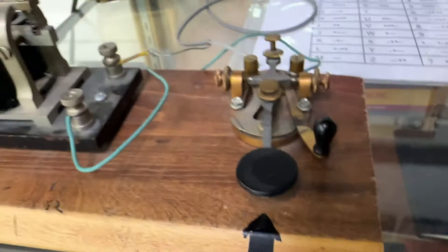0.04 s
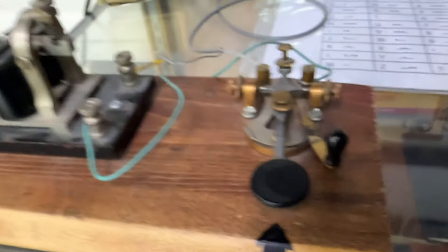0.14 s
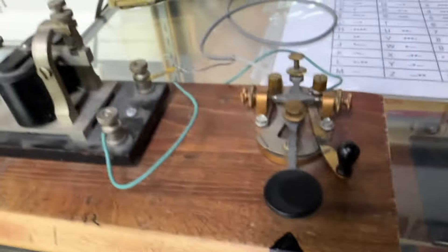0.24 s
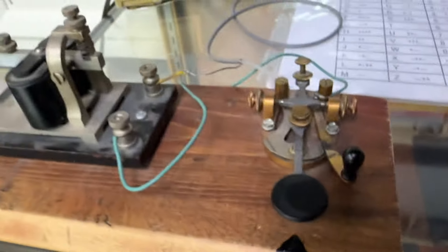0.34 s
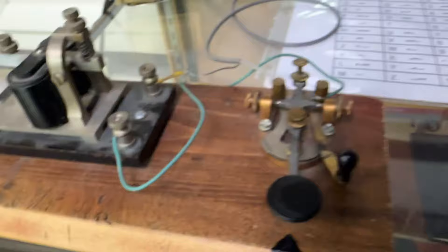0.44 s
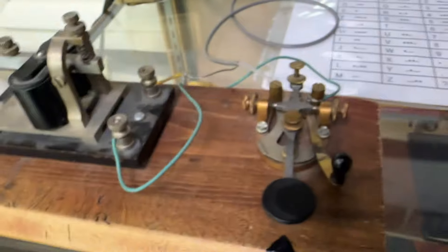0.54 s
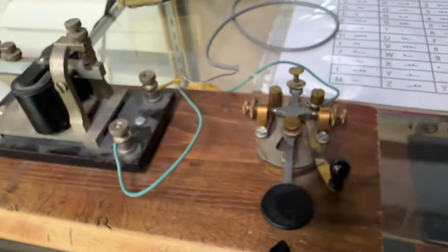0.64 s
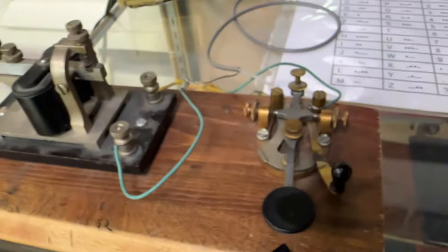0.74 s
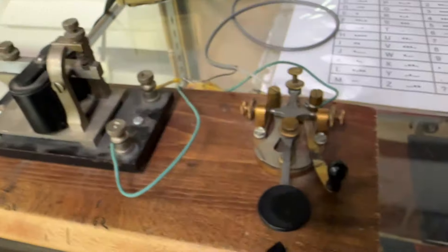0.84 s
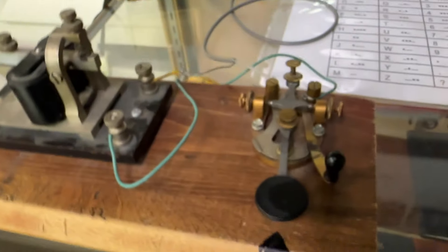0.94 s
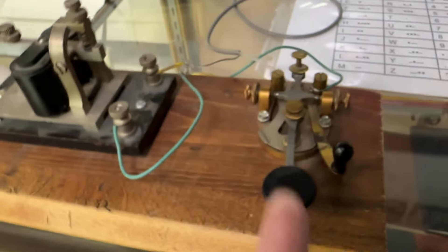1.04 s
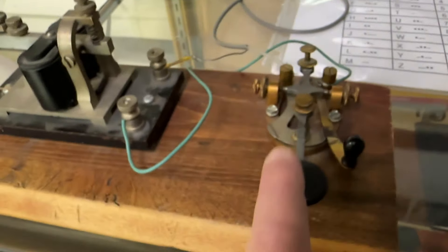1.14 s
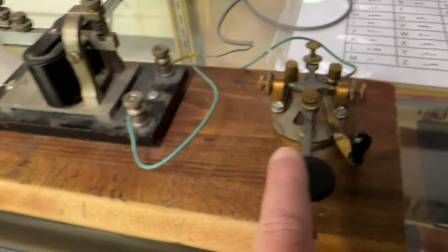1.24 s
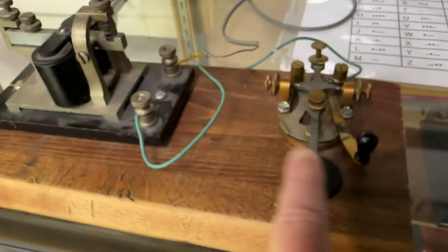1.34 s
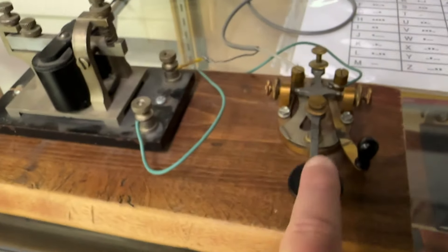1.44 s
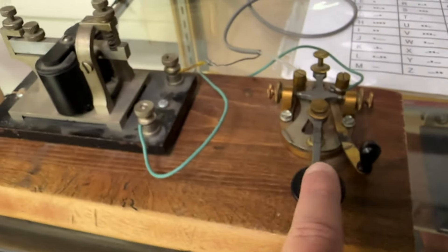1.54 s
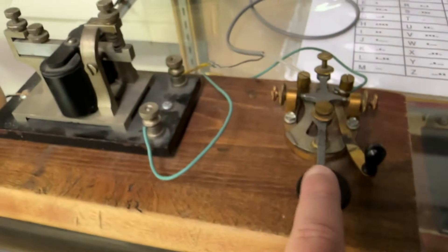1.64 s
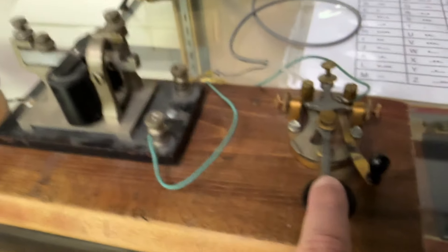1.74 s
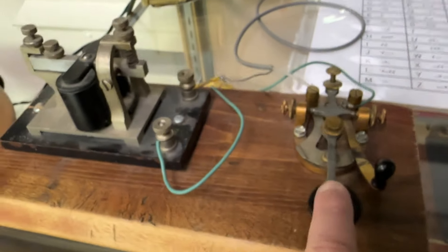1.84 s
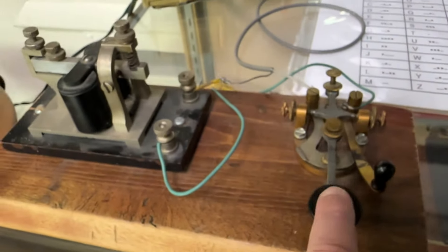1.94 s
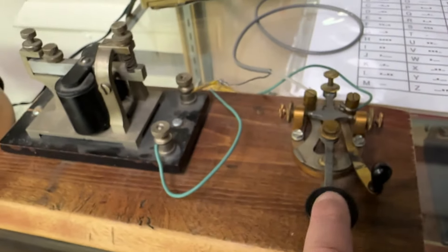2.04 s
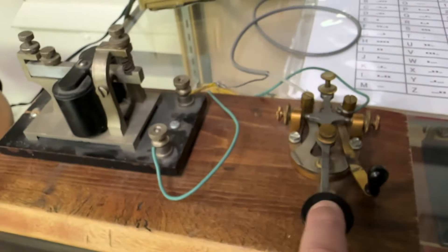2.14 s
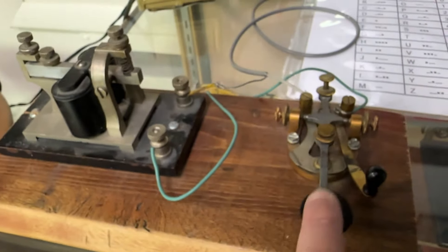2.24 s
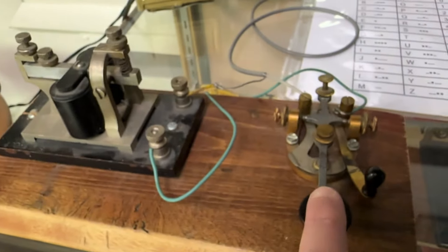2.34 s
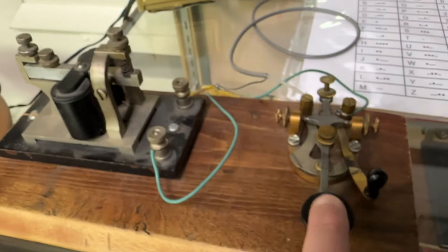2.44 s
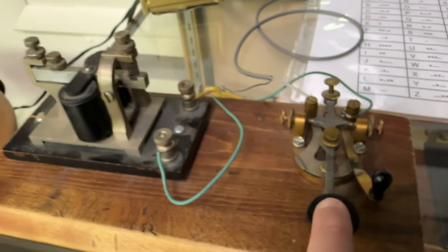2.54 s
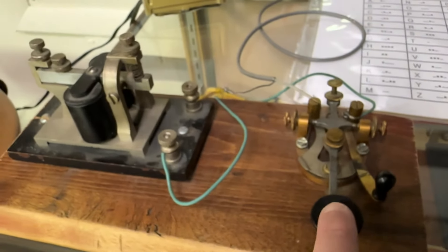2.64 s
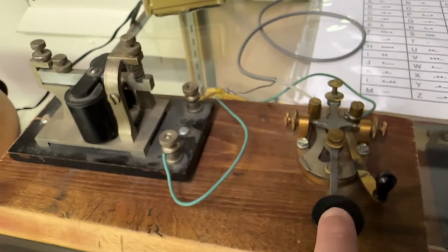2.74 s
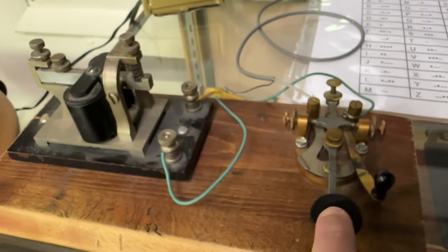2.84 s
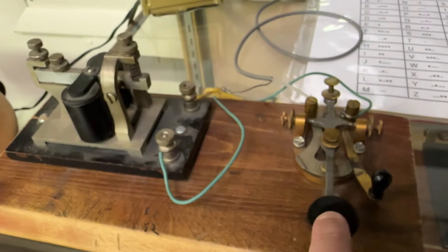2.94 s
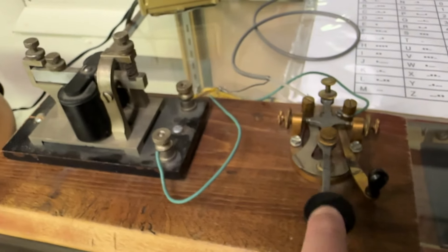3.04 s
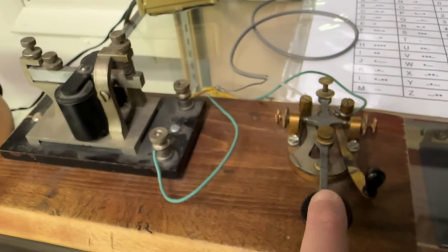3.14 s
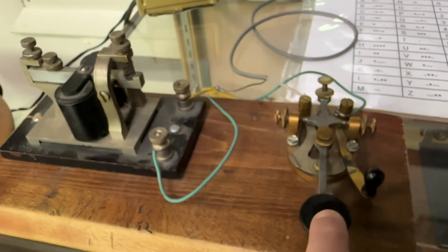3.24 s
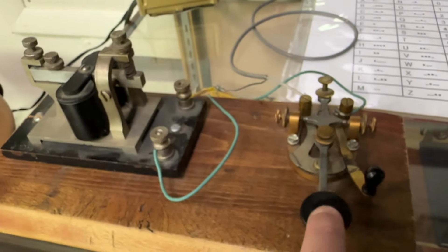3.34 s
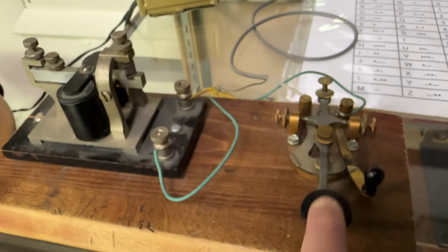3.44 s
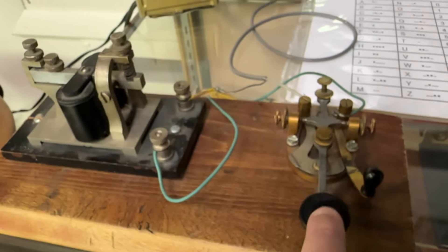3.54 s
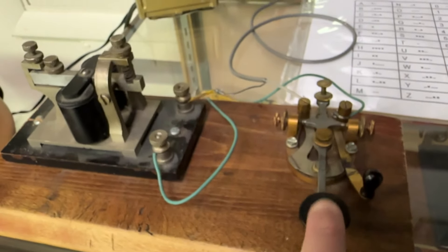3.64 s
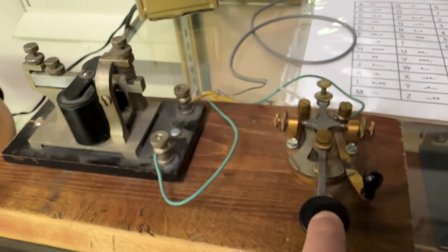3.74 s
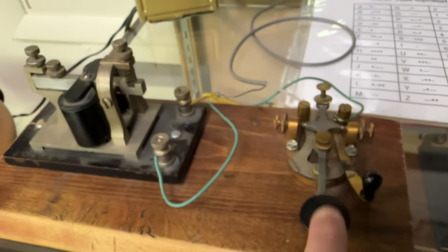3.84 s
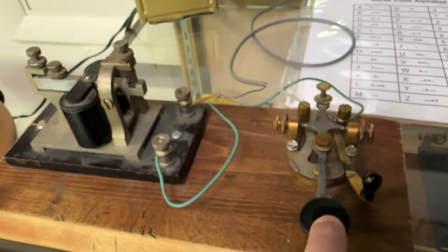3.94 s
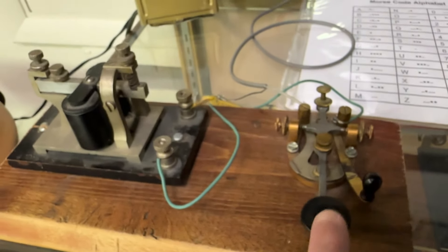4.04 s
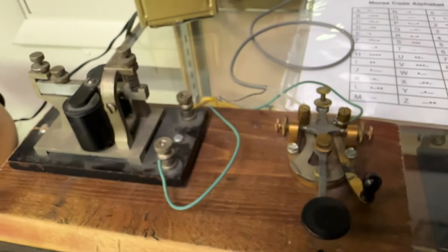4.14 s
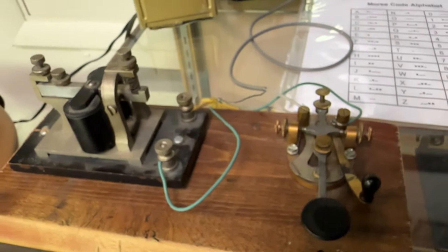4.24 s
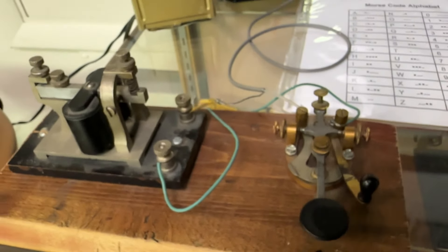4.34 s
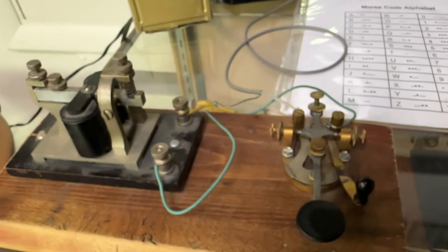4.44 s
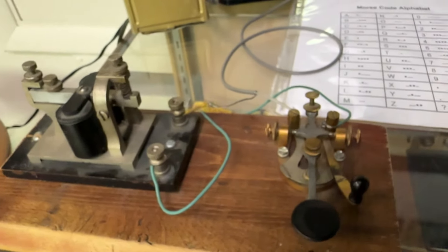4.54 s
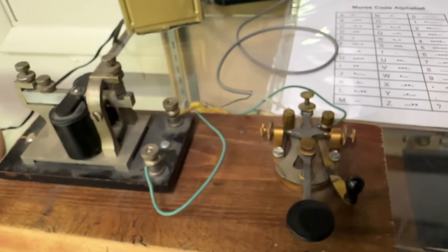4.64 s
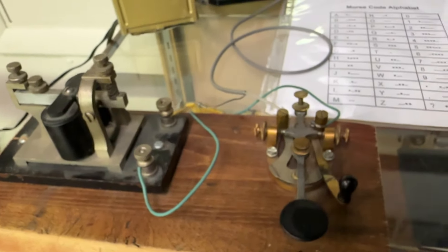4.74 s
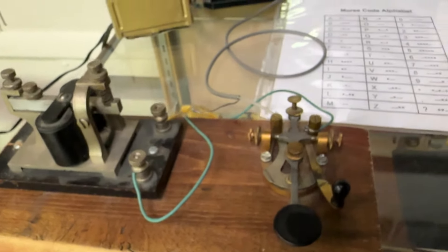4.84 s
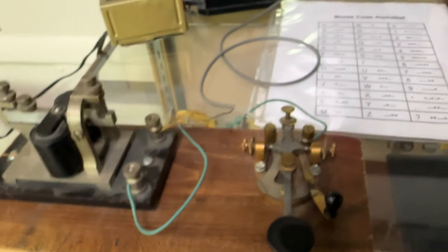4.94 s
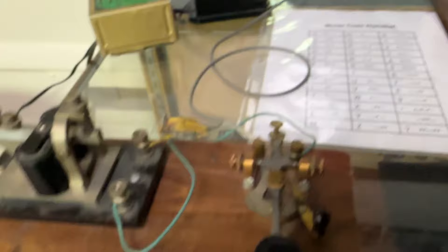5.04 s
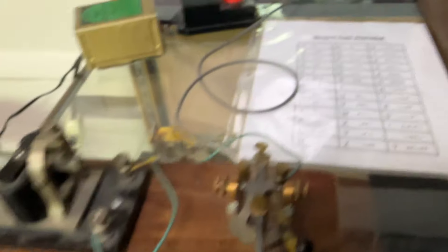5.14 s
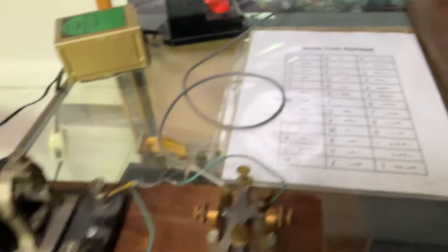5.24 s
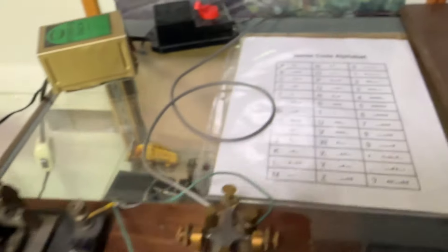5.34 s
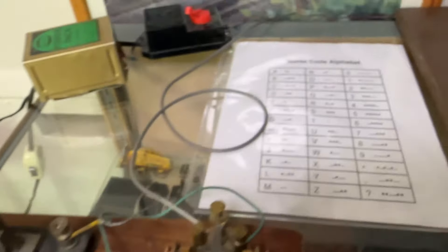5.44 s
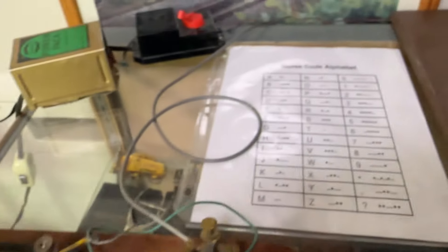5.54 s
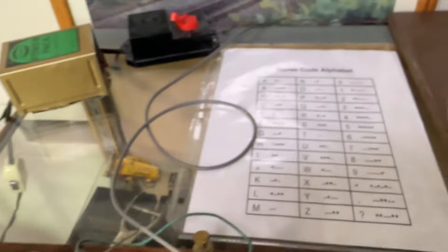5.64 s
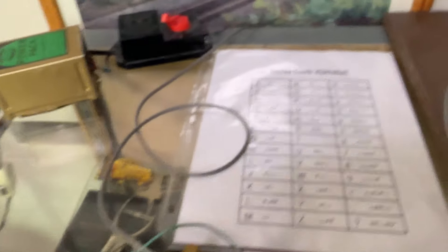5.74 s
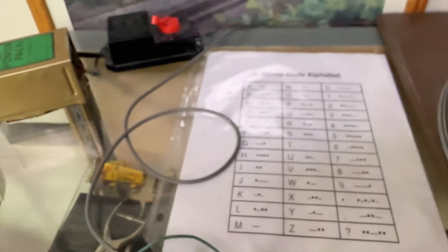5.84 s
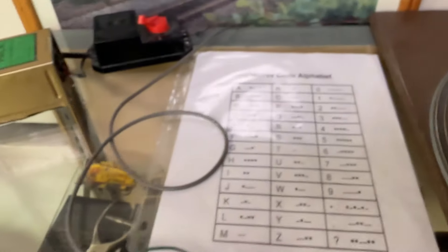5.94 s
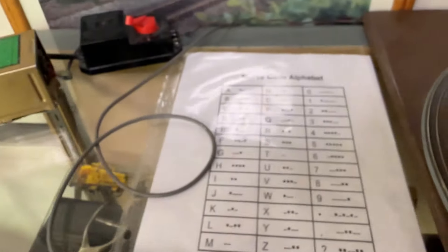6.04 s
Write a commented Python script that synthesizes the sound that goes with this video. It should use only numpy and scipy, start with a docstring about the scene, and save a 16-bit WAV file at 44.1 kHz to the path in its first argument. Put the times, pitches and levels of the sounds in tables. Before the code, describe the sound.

Five crisp metallic double clicks from a telegraph key and sounder on a wooden board, over a steady low fan hum in a small room.

```python
"""At first a hand rubs softly on a camera, while a ventilation fan hums and rushes and a high drone fades.
Then a finger taps a telegraph key five times on a wooden board, in a small room. Each press ticks the contact
and a sounder, mostly on the left, clicks down; on release it clacks up and the key meets its back stop.
Later the camera's lens drive rustles, whines in short bursts and hisses once, over a lower drone.
Blows are fading sine waves and noise bursts; the fan, drones and lens are sine waves and filtered noise."""
import sys
import numpy as np
from scipy import signal
from scipy.fft import rfft, irfft, next_fast_len
from scipy.io import wavfile
from scipy.ndimage import map_coordinates

SR = 44100
rng = np.random.default_rng(int(sys.argv[2]) if len(sys.argv) > 2 else 0)


def transcribe(u):
    """Save the signal u as a 16-bit wav file named by the first command-line argument.

    u: samples, shape (n,) or (channels, n), limited to [-1, 1]; the rate is SR.
    q: integer samples, one column per channel.
    """
    v = np.clip(np.atleast_2d(u).T, -1, 1)
    q = np.round(v * 32767).astype(np.int16)
    wavfile.write(sys.argv[1], SR, q)


N = 269010
T = np.arange(N) / SR  # time in seconds
AGE = T[:SR // 5]  # seconds since a blow

# The five taps. Each row: key contact closes in seconds, sounder lever hits anvil in seconds,
# lever hits upper screw in seconds, key meets back stop in seconds, finger's knock in dB, back stop in dB.
TAP_TIMES = [(2.0022, 2.021, 2.0863, 2.1294, -30, -32), (3.166, 3.1855, 3.2606, 3.2988, -31, -30),
             (3.414, 3.4369, 3.4681, 3.5016, -31, -30.5), (3.6138, 3.6295, 3.6762, 3.7036, -26.5, -30.5),
             (3.8062, 3.8208, 3.8772, 3.909, -22.5, -27)]
# Colour of the sounder's downward click. Each row: pitch in Hz, relative strength in dB per Hz.
CLICK_COLOUR = [(200, -28), (700, -18), (1100, -3), (1900, -17), (3000, -7), (4400, -5), (5700, 1),
                (6300, -4), (8200, -2.5), (9250, -9), (10200, 3), (11300, -13), (15000, -9), (16300, -21)]


def amp(db):
    """Decibels to gain."""
    return 10 ** (np.asarray(db) / 20)


def unit(x):
    """Scale to an rms (average strength) of 1."""
    return x / np.sqrt(np.mean(x ** 2) + 1e-20)


def along(points, hz):
    """Read a curve of (Hz, value) points on a log pitch axis."""
    point_hz, values = np.transpose(points)
    return np.interp(np.log(hz + 1), np.log(point_hz + 1), values)


def curves(rows):
    """One value per sample for each column after the time."""
    seconds, *columns = np.transpose(rows)
    return [np.interp(T, seconds, column) for column in columns]


def wobble(rate):
    """A smooth random curve through `rate` random points a second."""
    return map_coordinates(rng.standard_normal(int(N * rate / SR) + 4), [T * rate])


def filtered(x, response):
    """Change the strength of each pitch in x by a response that depends on Hz."""
    size = x.shape[-1]
    padded = next_fast_len(size + 8192)  # spare room, so that the end does not wrap onto the start
    spectrum = rfft(x, padded) * response(np.fft.rfftfreq(padded, 1 / SR))
    return irfft(spectrum, padded)[..., :size]


def noise(colour, size):
    """Two unrelated coloured noises, together of rms 1."""
    white = rng.standard_normal((2, size))
    return unit(filtered(white, lambda hz: amp(along(colour, hz))))


def band(centre_hz, width_hz):
    """Two unrelated noises in one resonance, together of rms 1."""
    white = rng.standard_normal((2, N))
    return unit(filtered(white, lambda hz: 1 / (1 + ((hz - centre_hz) / width_hz) ** 2)))


def pan(left_db):
    """Left and right gains that differ by left_db."""
    return amp(np.array([[.5], [-.5]]) * left_db)


def add(track, s, sound):
    """Mix a sound in at s seconds."""
    part = track[:, round(s * SR):][:, :sound.shape[-1]]
    part += sound[..., :part.shape[-1]]


def fade(t60, attack):
    """Envelope of a blow: a quick rise, then a fall of 60 dB in t60 seconds."""
    return amp(-60 * AGE / t60) * (1 - np.exp(-(AGE / attack) ** 2))


def gate(start, end, edge):
    """On between two times, with soft edges."""
    return np.clip((T - start) / edge + .5, 0, 1) * np.clip((end - T) / edge + .5, 0, 1)


def sounder(blows, modes, colour, ring_db, crack_db, crack_t60, rattle_db, rattle_t60, rattle_hz,
            attack, left_db):
    """The lever strikes a stop: a crack, short brass modes and a dense frame rattle, varying each time."""
    out = np.zeros((2, N))
    # each mode reaches the two ports by slightly different paths
    phases = rng.uniform(0, 2 * np.pi, (len(modes), 1, 1)) + rng.standard_normal((len(modes), 2, 1)) / 2
    grain = noise(colour, len(AGE))  # shared by all blows
    sustain = amp(-23.5) * fade(0.067, attack)  # the brass modes sing on faintly
    for s in blows:
        ring = 0
        for (hz, level, t60, side), phase in zip(modes, phases):
            strength = amp(level + 2 * rng.standard_normal()) * pan(side)
            angle = 2 * np.pi * hz * rng.normal(1, .004) * AGE + phase + rng.normal(0, .7)
            ring = ring + strength * (fade(t60, attack) + sustain) * np.sin(angle)
        dense = unit(grain + .7 * noise(colour, len(AGE)))  # the frame's countless close modes
        crack = amp(crack_db) * fade(crack_t60, attack) * dense
        dull = filtered(dense, lambda hz: 1 / np.sqrt(1 + (hz / rattle_hz) ** 10))
        rattle = amp(rattle_db) * fade(rattle_t60, 2 * attack) * dull
        add(out, s, amp(ring_db) * ring + pan(left_db) * (crack + rattle))
    return out


def base_plate(blows, hz, db, t60, attack, left_db):
    """Each blow drives the sounder's base against the wood: a hollow knock of a few cycles."""
    out = np.zeros((2, N))
    for s in blows:
        strength = amp(db + rng.standard_normal() / 2) * pan(left_db)
        add(out, s, strength * fade(t60, attack) * np.sin(2 * np.pi * hz * AGE))
    return out


def through_board(x, lag):
    """Bending waves are slower at low pitch: lag is the delay in seconds at 1 kHz."""
    return filtered(x, lambda hz: np.exp(-4j * np.pi * lag * np.sqrt(1000 * hz)))


def rebound(blows, delay, bounce_db):
    """The pulled-down lever bounces softly once: a short burst of noise."""
    out = np.zeros((2, N))
    for s in blows:
        burst = fade(t60=0.051, attack=0.0011) * noise(CLICK_COLOUR, len(AGE))
        add(out, s + delay, amp(bounce_db) * pan(left_db=2) * burst)
    return out


def loose_parts(blows, db, first, spread, loss_db_per_s, t60, count):
    """Pivots and screws shaken by a blow click at uneven moments, each at its own pitch."""
    low_hz, high_hz = 2600, 6000
    out = np.zeros((2, N))
    for s in blows:
        for when, size, pitch in rng.random((count, 3)):
            delay = first + spread * when
            hz = low_hz * (high_hz / low_hz) ** pitch
            colour = [(hz / 4, -16), (hz, 0), (2 * hz, -8), (4 * hz, -26)]
            click = fade(t60, attack=.0003) * noise(colour, len(AGE))
            add(out, s + delay, amp(db - loss_db_per_s * delay - 6 * size) * click)
    return out


def knock():
    """The board's low modes answer a blow together, in alternating directions."""
    # The wooden board. Each row: pitch in Hz, level in dB, time to fall 60 dB in seconds.
    board_modes = [(150, -13.5, 0.094), (205, -7.5, .07), (263, -8.5, 0.1), (326, -8, 0.029),
                   (460, -2, 0.031), (603, -5.5, 0.041), (840, -10, 0.04), (1300, -3.5, 0.032),
                   (1500, -2, 0.026)]
    total = 0
    for k, (hz, db, t60) in enumerate(board_modes):
        strength = (-1) ** k * amp(db + rng.standard_normal())
        total = total + strength * fade(t60, attack=0.0025) * np.sin(2 * np.pi * hz * AGE)
    return total


def after_ring(blows, ring_db, thump_db):
    """Each blow thumps the board and leaves the brass frame ringing faintly."""
    # The frame. Each row: pitch in Hz, level in dB before ring_db, time to fall 60 dB in seconds.
    frame_modes = [(1085, -41, 0.23), (1840, -46, 0.14), (2480, -41, .12), (3400, -49, .1),
                   (8400, -48, .07), (14780, -54, .1)]
    out = np.zeros((2, N))
    for s in blows:
        ring = 0
        for hz, db, t60 in frame_modes:
            tone = np.sin(2 * np.pi * (hz * AGE + rng.random((2, 1))))
            ring = ring + amp(db + 2 * rng.standard_normal()) * fade(t60, attack=0.0024) * tone
        add(out, s, amp(ring_db) * ring + amp(thump_db) * knock())
    return out


def key():
    """The contact ticks and knocks the board; let go, the lever chatters on its back stop."""
    # Colours of the contact's tick, the back stop and the dull thud of the table under the key.
    # Each row: pitch in Hz, relative strength in dB per Hz.
    tick_colour = [(200, -7), (800, 1), (1200, 0), (1900, -4), (2500, 4.5), (3500, -3), (6000, -8),
                   (10000, -10), (16000, -21)]
    stop_colour = [(200, -18), (600, -1.5), (1100, -9), (2200, -0.5), (3800, 2.5), (6000, -6), (9000, -6.5),
                   (12000, -18), (16000, -24)]
    thud_colour = [(80, -30), (150, -7), (220, 7.5), (330, -5), (470, 3), (600, -19), (1200, -21),
                   (4000, -70)]
    contact_db = -24
    chatter_s, chatter_loss_db = 0.0097, 2.5  # the key bounces once on its back stop
    out = np.zeros((2, N))
    for contact_s, _, _, stop_s, knock_db, stop_db in TAP_TIMES:
        tick = fade(t60=0.047, attack=0.00051) * noise(tick_colour, len(AGE))
        # the finger's weight goes into the table
        thud = fade(t60=0.065, attack=0.0025) * noise(thud_colour, len(AGE))[0]
        add(out, contact_s, amp(contact_db) * tick + amp(knock_db) * (knock() + amp(-6.0) * thud))
        for k in range(2):
            clack = fade(t60=0.059, attack=0.00077) * noise(stop_colour, len(AGE))
            add(out, stop_s + k * chatter_s, amp(stop_db - k * chatter_loss_db) * clack)
    return out


def handling():
    """Small dry ticks of handling and soft rubs of the hand on the camera body, all from noise."""
    # Small ticks. Each row: start in seconds, level in dB, centre pitch in Hz.
    handling_ticks = [(2.961, -43, 3000), (2.982, -40, 3000), (3.1414, -35, 5000), (3.789, -38, 4000),
                      (4.678, -38.5, 10000), (4.944, -39, 9970)]
    # Soft rubs. Each row: middle in seconds, length in seconds, level in dB, centre pitch in Hz.
    hand_rubs = [(.21, 0.29, -51.5, 275), (.14, .14, -61, 1700), (0.465, 0.15, -53.5, 290),
                 (0.904, 0.091, -59, 1400), (1.1, 0.36, -56, 305), (1.35, 0.7, -59, 1500),
                 (1.39, 0.072, -57, 1900), (1.577, 0.059, -50, 1600), (1.57, 0.057, -53, 650),
                 (1.88, 0.062, -58, 1200)]
    out = np.zeros((2, N))
    for s, db, hz in handling_ticks:
        colour = [(hz / 10, -14), (hz, 0), (2 * hz, -6), (4 * hz, -22)]
        add(out, s, amp(db) * fade(t60=0.041, attack=0.00046) * noise(colour, len(AGE)))
    for s, length, db, hz in hand_rubs:
        stroke = np.cos(np.pi * np.clip((T - s) / length, -.5, .5))  # swells and sinks once
        out += amp(db + 2 * wobble(39.5)) * stroke * band(hz, 0.36 * hz)
    return out


def room(x, delay):
    """The room's answer: a tail of fading noise in which the bass lasts longest."""
    # Each row: pitch in Hz, time to fall 60 dB in seconds.
    decay_times = [(150, 0.79), (1000, 0.19), (4000, 0.1), (9000, 0.29), (16000, 0.029)]
    hz, t, z = signal.stft(rng.standard_normal((2, SR // 2)), SR, nperseg=256)
    tail = signal.istft(z * amp(-60 * t / along(decay_times, hz)[:, None]), SR, nperseg=256)[1]
    tail = tail * (1 - np.exp(-(T[:tail.shape[1]] / delay) ** 2))  # the answer builds up softly
    wet = signal.fftconvolve(x, tail / np.linalg.norm(tail[0]), axes=1)[:, :N]
    tone = [(300, 3.5), (1200, 6.5), (4000, 6.5), (7000, -11.0), (12000, -8)]  # Hz, dB
    return filtered(wet, lambda hz: amp(along(tone, hz)))


def whine(octave_db, flutter_db):
    """Each burst of the lens drive sings a ragged high note with its octave and stirs the mount."""
    # The drive whines in short, sometimes overlapping bursts; several share nearly the same pitch.
    # Each row: start in seconds, end in seconds, pitch in Hz, level in dB, pitch jitter in Hz.
    whine_bursts = [(4.147, 4.17, 5950, -50, 50), (4.175, 4.256, 6420, -49, 47),
                    (4.234, 4.31, 7090, -53, 15), (4.327, 4.39, 7100, -47.5, 10),
                    (4.4, 4.595, 7100, -53, 23), (4.598, 4.64, 6220, -49, 40),
                    (4.63, 4.69, 6310, -46.5, 48), (4.68, 4.76, 5930, -51, 30),
                    (4.705, 4.765, 6200, -50.5, 80), (4.765, 4.825, 5760, -55, 60),
                    (4.855, 4.882, 6000, -57, 80), (4.88, 4.953, 5510, -53, 40),
                    (4.95, 5.08, 5600, -59.5, 130), (5.495, 5.596, 5870, -50, 75),
                    (5.602, 5.75, 5820, -56, 64), (5.765, 5.804, 5900, -49.5, 42),
                    (5.84, 5.992, 5870, -51.5, 70), (6.057, 6.12, 5900, -51, 30)]
    out = np.zeros((2, N))
    jitter, flutter = wobble(400), amp(flutter_db * wobble(45))
    # a resonance of the lens mount buzzes during every burst
    buzz = amp(-9) * band(centre_hz=6650, width_hz=290)
    for start, end, hz, db, jitter_hz in whine_bursts:
        level = amp(db) * flutter * gate(start, end, edge=.018)
        on = level > 0
        phase = 2 * np.pi * np.cumsum(hz + jitter_hz * jitter[on]) / SR
        note = pan(left_db=9.5) * np.sin(phase) + amp(octave_db) * np.sin(2 * phase)
        out[:, on] += level[on] * (note + buzz[:, on])
    return out


def lens_working(rise):
    """Rises from 0 to 1 as the lens drive sets in."""
    start_s = 3.87  # halfway up the rise
    return np.clip((T - start_s) / rise + .5, 0, 1)


def lens(hiss_db, rustle_db, grain_db):
    """The lens drive rustles while it works and hisses during one fast move, both grainy noise."""
    # Colours of the refocusing hiss and of the rustle. Each row: pitch in Hz, relative strength in dB per Hz.
    focus_colour = [(2500, -46), (3700, -19), (4200, 2), (4900, 4), (5600, -9), (6800, -7), (7800, -4),
                    (9000, -0.5), (10200, -6.5), (12300, -13), (13700, -4), (14400, -11), (15600, -6),
                    (16300, -35)]
    rustle_colour = [(2000, -30), (4500, -8), (6500, -6), (9000, -2), (11500, -3), (13000, -9), (15000, -2),
                     (16300, -14)]
    move_start_s, move_end_s = 5.168, 5.318
    hiss = amp(hiss_db) * gate(move_start_s, move_end_s, edge=.003) * noise(focus_colour, N)
    rustle = amp(rustle_db) * lens_working(rise=.2) * noise(rustle_colour, N)
    return amp(grain_db * wobble(120)) * (hiss + rustle)


def diffuse(colour):
    """Room noise of rms 1, whose left and right are more or less alike depending on pitch."""
    # Each row: pitch in Hz, left-right likeness (1 same, 0 unrelated, below 0 opposed).
    likeness = [(60, 0.19), (130, 0.76), (290, 0.72), (640, -0.27), (1410, -0.22), (3100, 0.084),
                (6820, -0.082), (15000, 0.9)]
    # Each row: pitch in Hz, left over right in dB.
    lean_left = [(60, -17), (200, 0), (700, 3), (1290, -1.5), (2380, -0.5), (4400, 2.5), (6000, 9),
                 (8000, 7.5), (10000, -1), (15000, 0.5)]

    def shares(hz):
        """Shares of a common part and an opposed part that give the likeness."""
        turn = np.arccos(np.clip(along(likeness, hz), -1, 1)) / 2
        return np.array([np.cos(turn), np.sin(turn)])

    mid, side = filtered(noise(colour, N), shares)
    both = np.array([mid + side, mid - side])
    return unit(filtered(both, lambda hz: pan(along(lean_left, hz))))


def ventilation(waver_db, drift, air_waver_db):
    """Wavering tones at multiples of the shaft rate, over a low rumble and a soft rush of air."""
    # The hum's tones. Each row: multiple of the shaft rate, relative level in dB.
    fan_lines = [(5, -4), (6.35, -10.5), (8, -12), (9, -2), (10, -22), (11, 0.5), (12, -6), (13, -9),
                 (16, -27.5), (20, -27)]
    # Colours of the rushing air and the rumble. Each row: pitch in Hz, relative strength in dB per Hz.
    air_colour = [(88, -30), (150, -3.5), (226, -4), (259, -2.5), (297, -7), (334, -6), (391, -10),
                  (457, -8), (837, -10), (1040, -10.5), (1310, -12), (1700, -13), (4760, -15),
                  (14500, -29.5), (16000, -45)]
    rumble_colour = [(15, -38), (28, -18), (45, -0.5), (60, 2), (100, -1.5), (135, -6.5), (180, -18),
                     (300, -39), (600, -94)]
    # Levels of the hum and of the rushing air. Each row: time in seconds, level in dB.
    hum_levels = [(0, -41.5), (1.1, -41.5), (3.05, -36.5), (6.1, -37.5)]
    air_levels = [(0, -47), (1.5, -47.5), (2.5, -47.5), (4.2, -46.5), (6.1, -44.5)]
    shaft_hz = 8.78
    rumble_db, rumble_db_per_s = -46, 0.26  # base level at mid-scene, and its slow growth
    hum_level, = curves(hum_levels)
    air_level, = curves(air_levels)
    lines = 0
    for k, db in fan_lines:
        strength = amp(db + waver_db * wobble(3.013))
        angle = 2 * np.pi * (k * shaft_hz * T + rng.random()) + drift * wobble(2.06)
        lines = lines + strength * np.sin(angle)
    hum = amp(hum_level) * unit(lines) * pan(left_db=2.0)
    near, far = noise(rumble_colour, N)
    growth = rumble_db_per_s * (T - T.mean())
    # long waves reach both ports almost alike
    rumble = amp(rumble_db + growth) * (near + 0.44 * np.array([far, -far]))
    air = amp(air_level + air_waver_db * wobble(5.85)) * diffuse(air_colour)
    return hum + rumble + air


def drone(levels, centre_hz, width_hz, waver_db):
    """A faint hollow drone in the room, a narrow band of noise, swells and sinks unevenly."""
    return amp(curves(levels)[0] + waver_db * wobble(9)) * band(centre_hz, width_hz)


def scene():
    """Key and sounder in the room, over the fan, the camera and the drones."""
    # The sounder's modes when struck on the anvil and on the upper screw. Each row: pitch in Hz,
    # level in dB before ring_db, time to fall 60 dB in seconds, left over right in dB.
    anvil_modes = [(945, -33, 0.02, -4), (1303, -27.5, 0.026, -6), (2486, -22.5, 0.021, 11),
                   (2630, -27, 0.015, 6), (3060, -28.5, 0.014, 9), (3740, -26.5, 0.022, 5.5),
                   (5036, -20.5, 0.014, 13), (5240, -16.5, 0.015, 16), (5560, -13, 0.016, 7),
                   (5910, -13, 0.014, 11.5), (6770, -18, 0.013, 13), (7640, -21.5, 0.011, 14),
                   (8230, -22, 0.0095, 16), (8550, -24, 0.01, 4), (8850, -21, 0.013, -3),
                   (9750, -9, 0.015, 1), (10240, -16, 0.011, 0), (11850, -23.5, .014, -4)]
    screw_modes = [(683, -29.5, 0.017, 2), (1078, -31, 0.082, -8), (1207, -27.5, 0.055, -12),
                   (1440, -21, 0.015, 4), (1604, -30, 0.04, 9), (1754, -26, 0.031, -8),
                   (1877, -31, 0.047, 7), (2090, -27, 0.015, 9), (2440, -19, 0.016, 9),
                   (3050, -22.5, 0.018, -1), (3370, -22.5, 0.022, 0), (3646, -21.5, 0.029, 3),
                   (4130, -25, 0.03, 7), (4380, -28, 0.025, 8), (4965, -23, 0.018, 9),
                   (5550, -18.5, 0.02, 11), (5950, -19.5, 0.018, 10), (6850, -11.5, 0.013, 10.5),
                   (7140, -11, 0.013, 9), (7800, -23, 0.014, 8), (8290, -16.5, 0.015, 11),
                   (8860, -19, .014, 1), (12370, -18.5, 0.015, -5), (14780, -25, .025, -4)]
    # Colour of the upward clack. Each row: pitch in Hz, relative strength in dB per Hz.
    clack_colour = [(200, -9), (500, -11), (750, -6), (1200, 0), (1900, -3), (3400, 1), (4300, -3),
                    (5600, -0.5), (6300, -2), (6950, 9), (7700, -4), (9000, 4), (10500, 1), (12000, 2),
                    (13700, -3), (15000, -5), (16300, -22)]
    # Levels of the higher and the lower drone. Each row: time in seconds, level in dB.
    high_levels = [(0, -57), (.7, -61.5), (1.5, -60), (2.4, -73)]
    low_levels = [(3.8, -70), (4.05, -57.5), (4.5, -63), (4.8, -57.5), (5.02, -57), (5.25, -72), (5.6, -62),
                  (5.8, -62), (6.05, -57)]
    _, anvil_s, screw_s, *_ = np.transpose(TAP_TIMES)
    down = sounder(anvil_s, anvil_modes, CLICK_COLOUR, ring_db=1.0, crack_db=-14, crack_t60=0.026,
                   rattle_db=-30.0, rattle_t60=0.038, rattle_hz=9500, attack=0.0006, left_db=2.5)
    up = sounder(screw_s, screw_modes, clack_colour, ring_db=-0.5, crack_db=-11, crack_t60=0.02,
                 rattle_db=-18.0, rattle_t60=0.042, rattle_hz=7800, attack=0.0011, left_db=2.5)
    down += base_plate(anvil_s, hz=1210, db=-14.5, t60=0.014, attack=.0007, left_db=-6)
    up += base_plate(screw_s, hz=1112, db=-2.5, t60=0.0088, attack=0.00086, left_db=-1.5)
    down_db, up_db = -2, -3  # magnet and spring strike equally hard at every tap
    clicks = through_board(amp(down_db) * down + amp(up_db) * up, lag=0.00099)
    ringing = after_ring(anvil_s, ring_db=2.5, thump_db=-35) + after_ring(screw_s, ring_db=-6, thump_db=-37)
    rattles = loose_parts([*anvil_s, *screw_s], db=-23, first=.006, spread=.04, loss_db_per_s=280,
                          t60=0.012, count=4)
    bounces = rebound(anvil_s, delay=.012, bounce_db=-30.5)
    taps = clicks + ringing + rattles + key() + bounces + handling()
    camera = lens(hiss_db=-36, rustle_db=-55.5, grain_db=1.4) + whine(octave_db=-9.0, flutter_db=3.0)
    fan = ventilation(waver_db=1.5, drift=0.33, air_waver_db=0.8)
    low_drone = drone(low_levels, centre_hz=705, width_hz=65, waver_db=2)
    high_drone = drone(high_levels, centre_hz=1022, width_hz=110, waver_db=2)
    return taps + amp(-13.5) * room(taps, delay=0.0034) + fan + camera + low_drone + high_drone


def record(dry):
    """The camera rounds off the highest peaks and cuts steeply above its band limit."""
    top_hz = 16300
    rounded = dry / (1 + np.abs(dry) ** 6) ** (1 / 6)
    return filtered(rounded, lambda hz: 1 / np.sqrt(1 + (hz / top_hz) ** 160))


dry = scene()
out = record(dry)
transcribe(out)
```